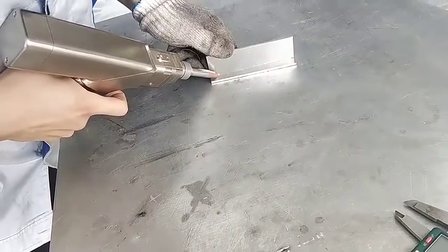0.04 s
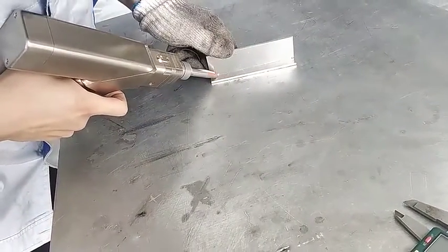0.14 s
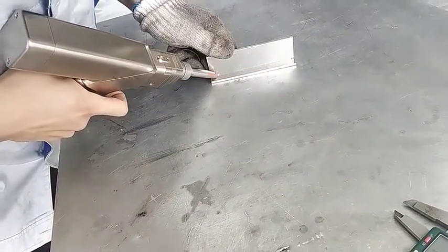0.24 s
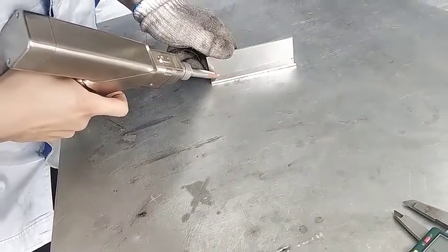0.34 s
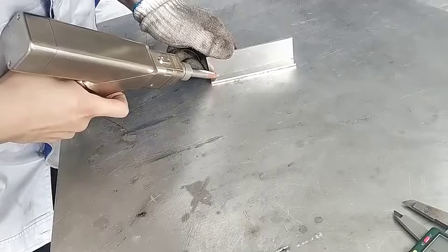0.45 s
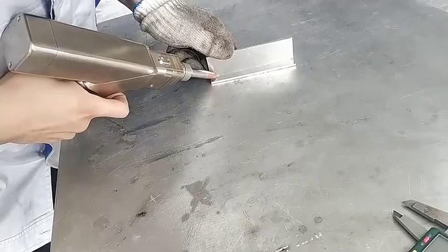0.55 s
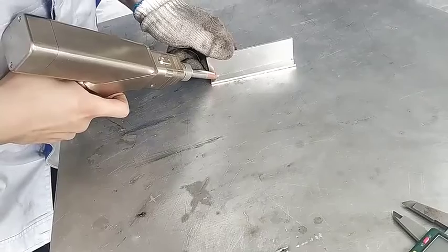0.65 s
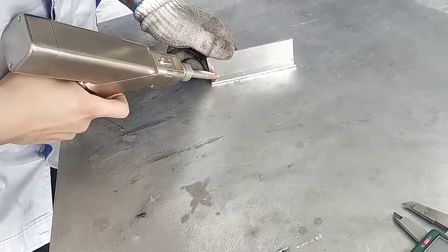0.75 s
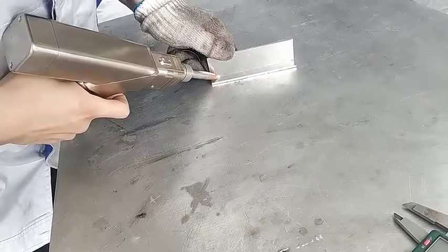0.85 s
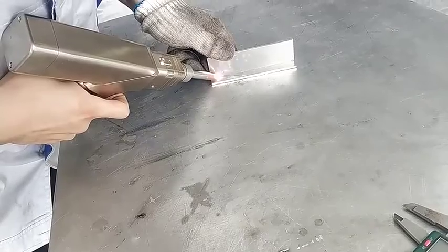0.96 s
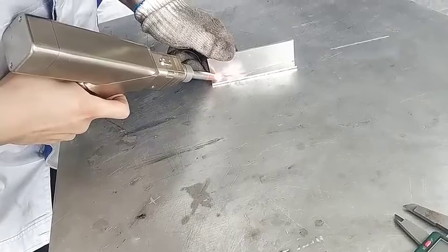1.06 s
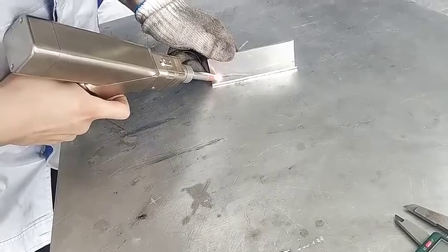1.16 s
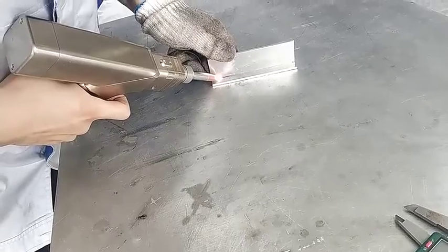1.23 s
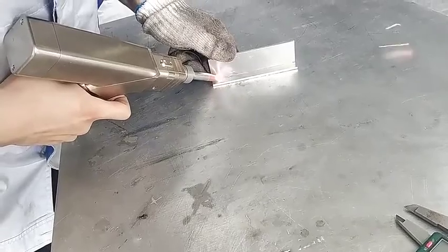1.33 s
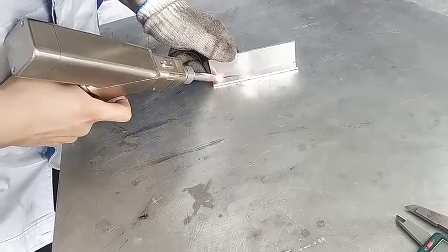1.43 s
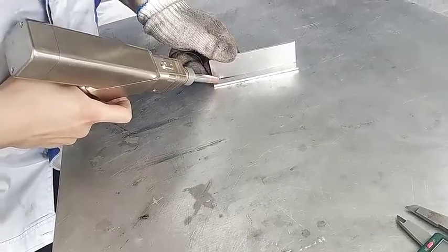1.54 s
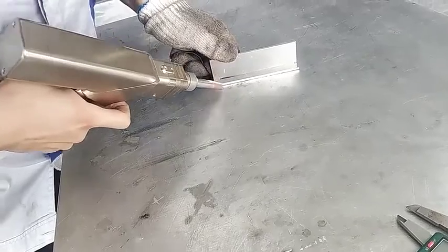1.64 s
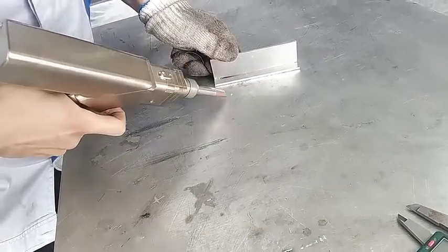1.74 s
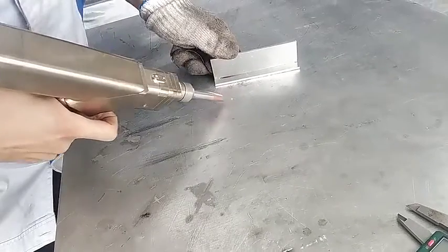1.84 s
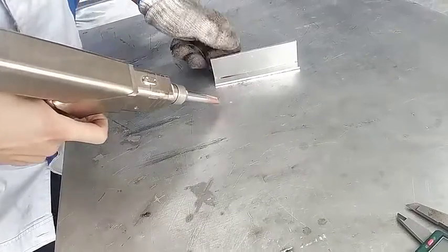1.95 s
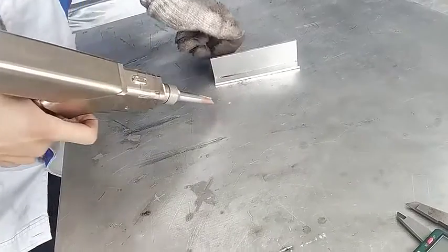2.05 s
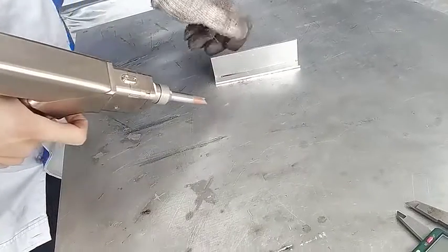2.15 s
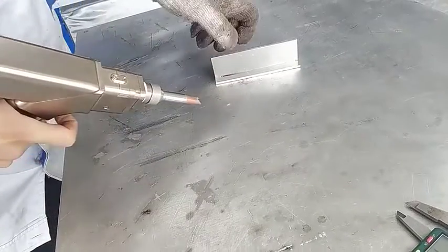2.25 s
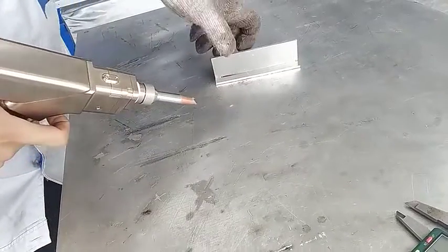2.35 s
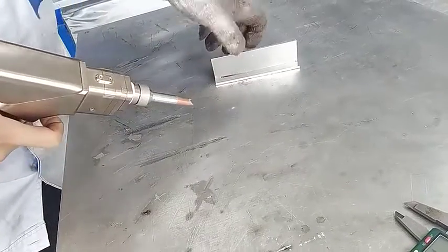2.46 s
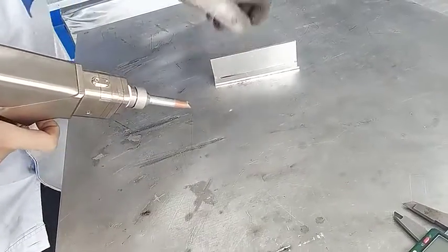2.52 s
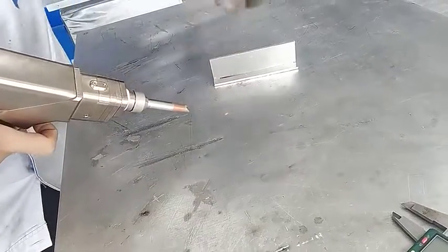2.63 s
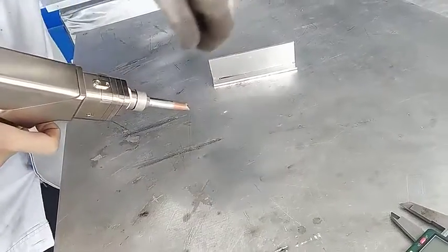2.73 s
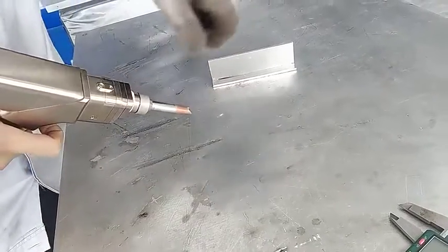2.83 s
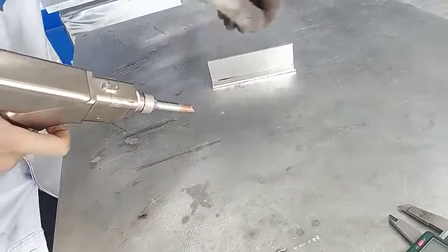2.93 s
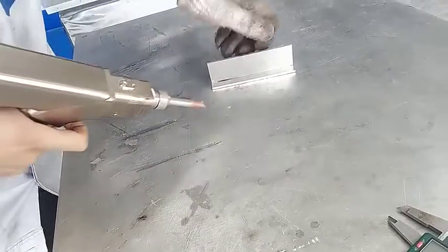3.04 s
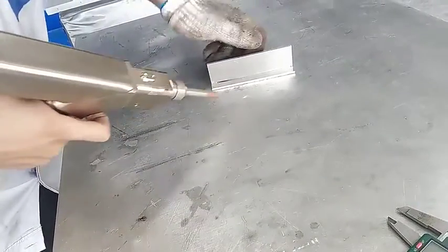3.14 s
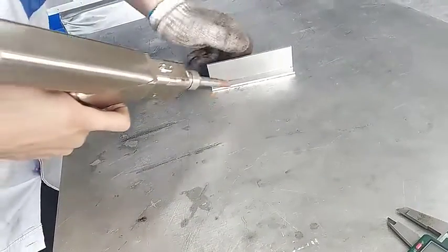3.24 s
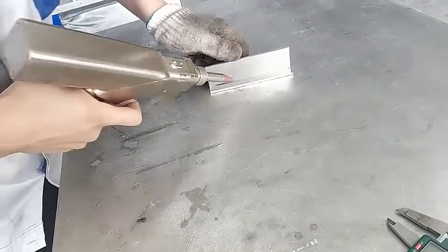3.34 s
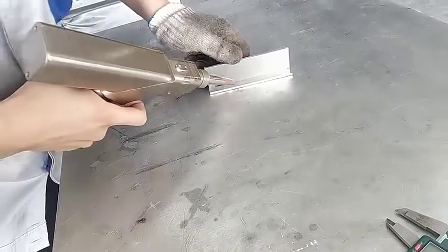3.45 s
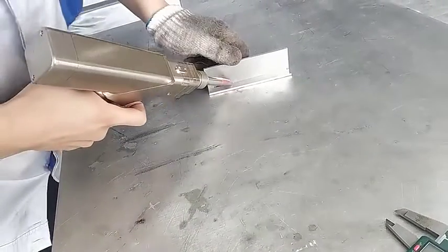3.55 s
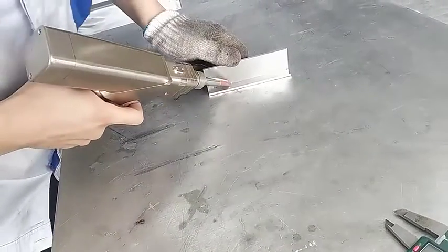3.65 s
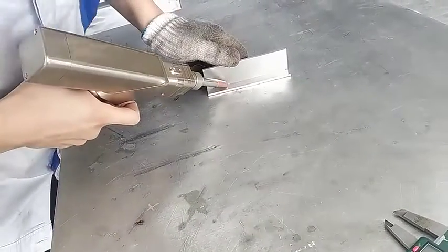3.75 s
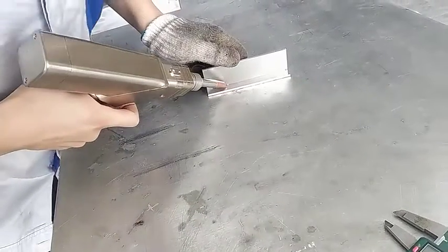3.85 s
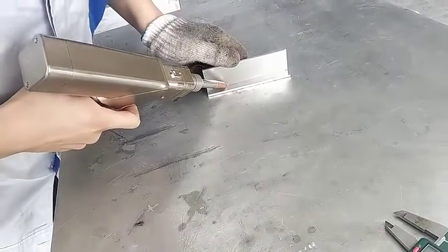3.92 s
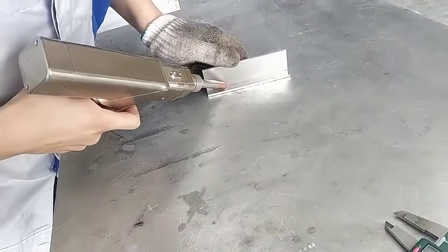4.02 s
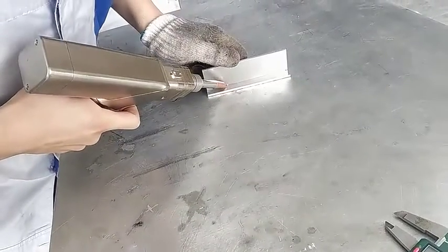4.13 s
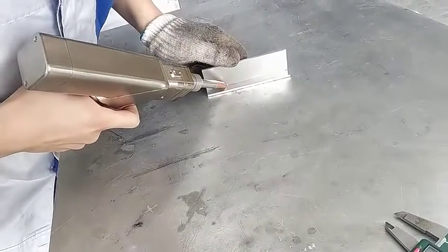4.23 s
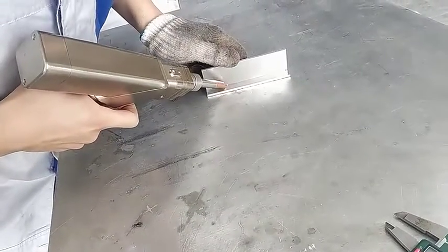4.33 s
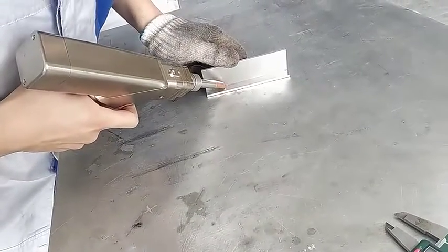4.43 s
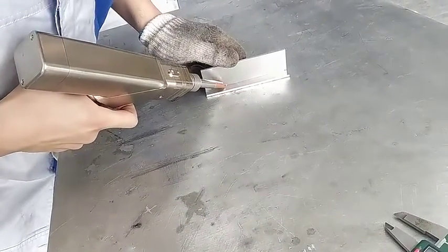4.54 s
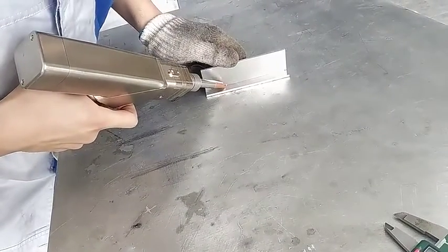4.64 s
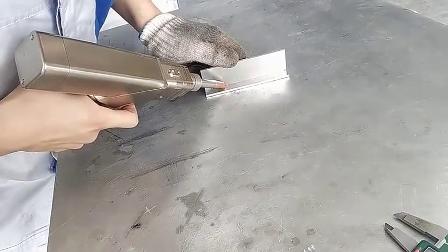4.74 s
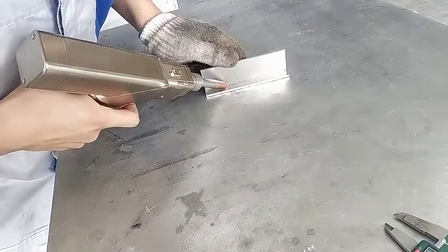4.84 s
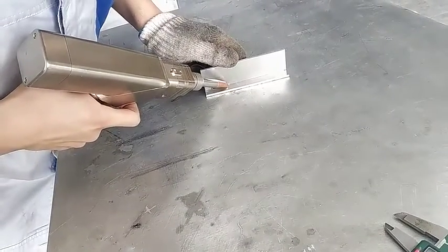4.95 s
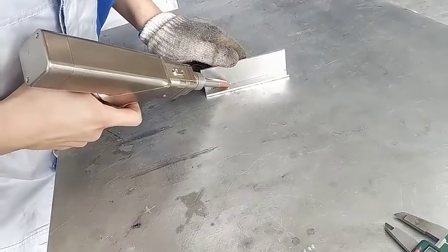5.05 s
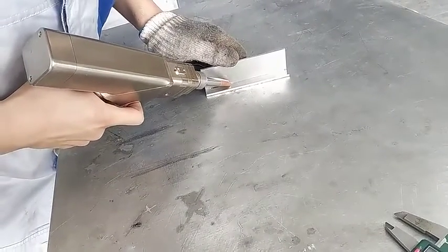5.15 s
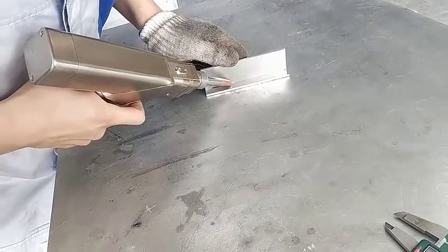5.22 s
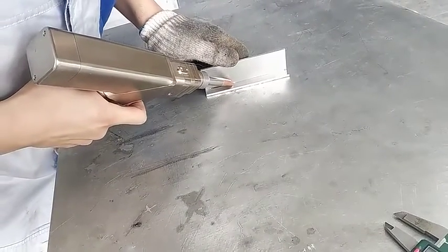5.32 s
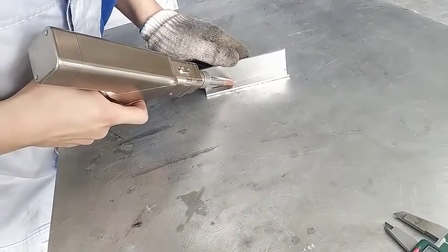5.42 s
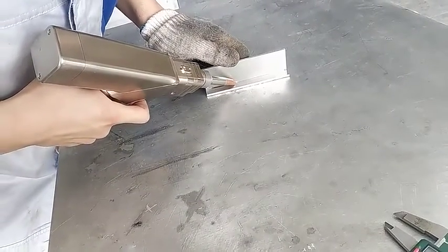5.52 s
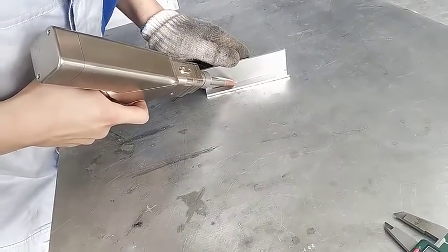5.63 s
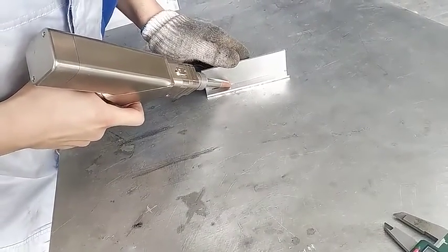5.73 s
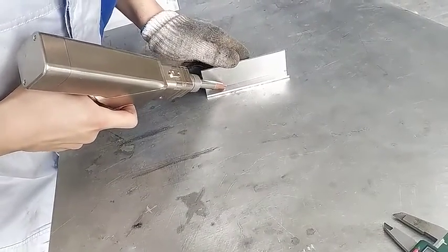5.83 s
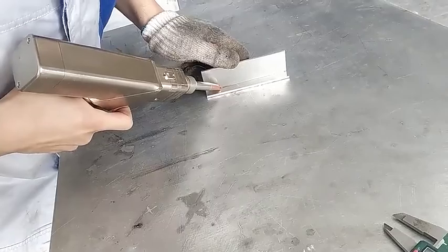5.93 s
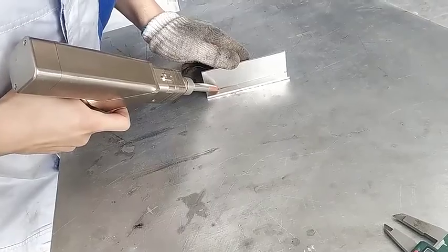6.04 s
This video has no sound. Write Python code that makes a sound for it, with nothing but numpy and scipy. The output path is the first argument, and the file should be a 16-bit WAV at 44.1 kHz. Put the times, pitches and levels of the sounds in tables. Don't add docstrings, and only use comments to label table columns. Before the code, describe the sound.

Steady fan drone and gritty scraping on steel, then a hard relay snap and a short gas hiss, followed by busy, bursting scrapes.

```python
import sys
import numpy as np
from scipy import signal
from scipy.fft import rfft, irfft, next_fast_len
from scipy.io import wavfile
from scipy.ndimage import uniform_filter1d, map_coordinates

SR = 44100
rng = np.random.default_rng(int(sys.argv[2]) if len(sys.argv) > 2 else 0)


def attenuation_scalar(level_db):
    decades = np.asarray(level_db, float) / 20
    return 10 ** decades


def pcm_store(signal):
    levels = np.round(np.clip(np.atleast_2d(signal), -1, 1) * 32767)
    wavfile.write(sys.argv[1], SR, levels.astype(np.int16).T)


N = 268128


def unit(x):
    return x / np.sqrt(np.mean(x ** 2) + 1e-20)


def along(points, hz):
    f, v = np.transpose(points)
    return np.interp(np.log(hz + 1), np.log(f + 1), v)


def curves(rows):
    s, *cols = np.transpose(rows)
    return [np.interp(np.arange(N) / SR, s, c) for c in cols]


def wobble(rate):
    knots = rng.standard_normal(int(N * rate / SR) + 4)
    return map_coordinates(knots, [np.arange(N) * rate / SR])


def held(start, end, rise_db, fall_db):
    t = np.arange(N) / SR
    return -rise_db * np.maximum(start - t, 0) - fall_db * np.maximum(t - end, 0)


def filtered(x, response):
    m = next_fast_len(N + SR // 2)
    return irfft(rfft(x, m) * response(np.fft.rfftfreq(m, 1 / SR)), m)[..., :N]


def peaks(modes, hz):
    return sum(attenuation_scalar(2 * db) / (1 + (2 * (hz - c) / w) ** 2) for c, w, db in modes)


def rush(response, patchy_db, gritty_db):
    grains = rng.standard_normal(N) * attenuation_scalar(gritty_db * wobble(500))
    z = signal.stft(grains, nperseg=512)[2]
    field = uniform_filter1d(uniform_filter1d(rng.standard_normal(z.shape), 5, 0), 8, 1)
    patchy = signal.istft(z * attenuation_scalar(patchy_db * unit(field)), nperseg=512)[1][:N]
    return unit(filtered(patchy, response))


def favour(x, s, centre_hz, width_hz, db):
    hz, t, z = signal.stft(x, SR, nperseg=512)
    offset = hz[:, None] - np.interp(t, s, centre_hz)
    rise = attenuation_scalar(2 * np.interp(t, s, db)) / (1 + (2 * offset / width_hz) ** 2)
    gain = np.sqrt(1 + rise)
    gain = gain * np.linalg.norm(z, axis=0) / (np.linalg.norm(z * gain, axis=0) + 1e-12)
    return signal.istft(z * gain, nperseg=512)[1][:N]


# frequency in Hz, density in dB per Hz.
FAN_AIR = [(25, -16), (75, -15), (124, -11.5), (182, -3.5), (218, -3.5), (400, -5), (650, -10), (1230, -14),
           (2850, -11.5), (6430, -14), (8960, -21), (9900, -14.5), (10400, -29), (11090, -32),
           (11200, -120)]
# frequency in Hz, width in Hz, rise over the air in dB.
FAN_TONES = [(200, 5, 9.5), (231, 14, 4), (286, 14, 5), (330, 30, 0), (600, 10, 3), (2655, 40, 3),
             (2960, 30, 4), (5000, 16, 5)]


def fans():
    colour = lambda hz: attenuation_scalar(along(FAN_AIR, hz)) * np.sqrt(1 + peaks(FAN_TONES, hz))
    air = rush(colour, patchy_db=1.27, gritty_db=0.24)
    rumble = filtered(air, lambda hz: 1 / (1 + (hz / 330) ** 4))
    lumps = attenuation_scalar(1.6 * wobble(16) - .3)
    return attenuation_scalar(-29.5) * attenuation_scalar(0.44 * wobble(9.8)) * (air + (lumps - 1) * rumble)


# frequency in Hz, density in dB per Hz.
HISS_COLOUR = [(2650, -17.5), (4500, -8.5), (6110, -3.5), (7360, -2.5), (9280, 0.5), (10300, -10),
               (11080, -30), (11180, -68), (22000, -120)]
# frequency in Hz, density in dB per Hz.
RASP_COLOUR = [(250, -14), (600, -17.5), (1200, -11.5), (1900, -5), (2700, -1), (3500, -3), (5500, -4),
               (7000, -33)]
# time in seconds, pressure in dB, coarseness in dB.
LIGHT_CONTACT = [(0, -34, -9), (.3, -33.5, -4.5), (.47, -28.5, -1.5), (.64, -32.5, 1), (.72, -32.5, -4),
                 (.89, -34.5, -23), (1.3, -42, 5), (1.5, -31, -2), (1.9, -31, -5), (2.1, -32.5, -2),
                 (2.92, -31.5, -5), (3.1, -31.5, 2), (3.5, -30, -1), (4.0, -41, 5.5), (4.9, -37.5, 0.5),
                 (5.5, -31, 0.5), (5.7, -36, -7.5), (5.95, -31.5, -2.5), (6.08, -31.5, -3)]
# start in seconds, hold in seconds, pressure in dB, coarseness in dB,
# easing off in dB per second.
HAND_PUSHES = [(1.425, 0.091, -34.5, -2.5, 80), (2.324, 0.046, -30.5, -2, 80),
               (2.415, 0.16, -28.5, -1.5, 80), (2.783, 0.025, -31, 0, 84), (3.147, 0.055, -27, -3.5, 63),
               (3.358, 0.051, -23.5, -6, 76), (3.6, 0.086, -23.5, -5, 90), (3.802, 0.14, -27.5, -5.5, 300),
               (4.02, .02, -30.5, -7, 80), (4.093, 0.1, -22.5, -8, 220), (4.325, 0.13, -24.5, -5.5, 76),
               (4.606, 0.19, -27.5, -3, 200), (4.948, 0.13, -31.5, -4, 83), (5.293, 0.061, -27.5, -2.5, 76)]
# time in seconds, high ring in Hz, low ring in Hz,
# low ring in dB.
TOOL_ANGLE = [(0, 9000, 3100, -13), (.8, 9200, 2800, -3), (1.9, 8800, 2900, -10), (2.6, 8700, 3370, 1),
              (3.14, 8830, 2840, -9), (3.4, 8600, 3660, 10), (3.68, 8100, 2920, -13), (3.8, 9400, 2990, -3),
              (3.87, 8100, 3000, 20), (3.96, 7960, 2570, -4), (4.15, 8250, 2820, -16),
              (4.38, 9200, 3600, 5), (4.7, 8500, 2900, 0), (5.2, 9000, 2850, -15), (5.32, 9250, 3700, 11),
              (5.6, 8600, 3000, 1), (6.08, 9300, 2900, -16)]
PRESS_DB_PER_S = 244


def abrasive():
    rest_db, coarse_db = curves(LIGHT_CONTACT)
    hiss_power, rasp_power = attenuation_scalar(2 * rest_db), attenuation_scalar(2 * (rest_db + coarse_db))
    for s, hold, db, coarse, lift in HAND_PUSHES:
        push = attenuation_scalar(2 * (db + held(s, s + hold, PRESS_DB_PER_S, lift)))
        hiss_power = hiss_power + push
        rasp_power = rasp_power + push * attenuation_scalar(2 * coarse)
    chatter_db = .5 * wobble(22.25)
    high = rush(lambda hz: attenuation_scalar(along(HISS_COLOUR, hz)), patchy_db=2.0, gritty_db=1.5)
    low = rush(lambda hz: attenuation_scalar(along(RASP_COLOUR, hz)), patchy_db=1.7, gritty_db=1.3)
    s, high_hz, low_hz, ring_db = np.transpose(TOOL_ANGLE)
    high = favour(high, s, high_hz, width_hz=1900, db=5.5 + 0 * s)
    low = favour(low, s, low_hz, width_hz=550, db=ring_db)
    hiss = attenuation_scalar(1.5) * np.sqrt(hiss_power) * high
    rasp = attenuation_scalar(1.0) * np.sqrt(rasp_power) * low
    return attenuation_scalar(chatter_db) * (hiss + rasp)


# time in seconds, length in ms, level in dB, high ring in Hz, low ring in Hz.
GRIT_DIGS = [(0.486, 22, -25, 7950, 3600), (1.747, 14, -21, 7100, 2750), (1.757, 41, -21, 7550, 3100),
             (1.853, 48, -24.5, 9400, 2500), (1.906, 16.5, -19, 7200, 2700), (1.926, 42, -26.5, 8500, 2620),
             (2.509, 26, -22, 7460, 3300), (2.578, 31, -21, 9100, 3370), (2.868, 30, -23.5, 9100, 3000),
             (3.005, 22, -29, 9400, 2790), (3.134, 12, -22, 8800, 2720), (3.202, 14, -20, 8300, 2620),
             (3.249, 19, -22.5, 7840, 3430), (3.382, 74, -31, 8400, 3300), (3.581, 15, -20, 7440, 3480),
             (3.868, 16, -20, 9100, 2900), (3.929, 8, -22, 7900, 2700), (4.124, 77, -28, 7900, 3260),
             (4.336, 8.9, -23, 9350, 3230), (4.655, 18, -20.5, 9050, 4100), (4.73, 10, -18.5, 8200, 2760),
             (4.779, 20, -21.5, 7300, 2750), (4.969, 11, -20, 9100, 3100)]
# time in seconds, length in ms, level in dB,
# high ring in Hz.
EDGE_SKIMS = [(2.256, 10, -25, 8850), (2.406, 28, -21, 7350), (2.745, 29, -22, 10000),
              (2.779, 16, -18.5, 9000), (2.815, 19, -17, 7700), (2.43, 20, -24, 8800),
              (3.492, 15, -20, 9400), (3.681, 33, -26, 7850), (3.615, 13, -28, 9400),
              (3.703, 14, -23, 7400), (3.735, 14, -26, 9400), (3.81, 18, -23, 8200), (3.842, 13, -20, 9400),
              (3.898, 12, -20.5, 7340), (4.023, 18, -26, 9200), (4.088, 14, -23, 8300),
              (4.177, 18, -22, 9100), (4.37, 18, -18.5, 9200), (4.29, 28, -24, 8850),
              (4.396, 21, -20, 9100), (4.428, 16, -18.5, 9000), (4.49, 25, -30, 8500),
              (4.531, 54, -36, 8500), (4.35, 23, -27, 9200), (2.235, 20, -30, 8800), (4.567, 12, -22, 9380),
              (4.614, 11, -18, 7750), (4.685, 21, -20, 7600), (4.93, 40, -28.5, 8800),
              (5.005, 12, -19.5, 7960), (5.037, 18, -20, 9300), (5.074, 23, -19.5, 7400),
              (5.123, 25, -24, 7620), (5.297, 15, -22, 9700), (5.354, 14, -23, 9400),
              (5.39, 18, -23.5, 8900)]
# time in seconds, length in ms,
# level in dB, ring in Hz.
PLATE_GROANS = [(0.42, 82, -32, 3100), (0.55, 50, -35, 2850), (3.63, 58, -26, 3700), (3.831, 40, -26, 2900),
                (3.86, 65, -26.5, 2800), (2.575, 49, -29, 3100), (2.42, 40, -29, 3000),
                (4.13, 97, -27.5, 2680), (3.661, 90, -32, 5540), (4.39, 70, -33, 4200),
                (4.529, 110, -29.5, 3600), (5.33, 82, -31.5, 3600), (5.42, 81, -31, 3700),
                (5.52, 70, -37, 4000)]
DIG_RASP_DB, SKIM_RASP_DB, SKIM_LOW_HZ = -3, -24, 3100
GROAN_OVER_DB = 20


def catches():
    out, size = np.zeros(N + SR), 8192
    t, hz = (np.arange(size) - size // 2) / SR, np.fft.rfftfreq(size, 1 / SR)
    bites = [(*dig, DIG_RASP_DB) for dig in GRIT_DIGS]
    bites += [(*skim, SKIM_LOW_HZ, SKIM_RASP_DB) for skim in EDGE_SKIMS]
    bites += [(s, ms, db - GROAN_OVER_DB, 8000, ring_hz, GROAN_OVER_DB) for s, ms, db, ring_hz in PLATE_GROANS]
    for s, ms, hiss_db, hiss_hz, rasp_hz, under_db in bites:
        swell = np.exp(np.where(t < 0, 1, .4) * -(t / (ms * 0.00043)) ** 2)
        rings = [(hiss_db, hiss_hz, HISS_COLOUR, 350, 9),
                 (hiss_db + under_db, rasp_hz, RASP_COLOUR, 450, 6)]
        for db, ring_hz, colour, width_hz, rise_db in rings:
            gain = attenuation_scalar(along(colour, hz)) * np.sqrt(1 + peaks([(ring_hz, width_hz, rise_db)], hz))
            flutter_db = 0.42 * np.repeat(rng.standard_normal(size // 64), 64)
            grit = rng.standard_normal(size) * attenuation_scalar(flutter_db)
            burst = swell * unit(irfft(rfft(grit) * gain))
            out[round(s * SR) - size // 2:][:size] += attenuation_scalar(db - 2.0) * burst
    return out[:N]


# frequency in Hz, width in Hz, level in dB.
NOZZLE_MODES = [(7440, 190, -7), (7650, 150, -5.5), (8200, 300, -10), (8650, 200, -8), (8900, 200, -8),
                (9550, 260, 2), (10150, 380, -4), (10980, 400, -11)]
# frequency in Hz, width in Hz, level in dB.
HOSE_MODES = [(2680, 140, -4), (3350, 130, -4), (4220, 220, -2), (5030, 150, 1), (5660, 150, 3),
              (7550, 300, 3)]
HOSE_FILL_S, VALVE_OPEN_S, SNAP_S, VALVE_SHUT_S, HOSE_EMPTY_S = .914, .92, .9301, 1.455, 1.58
OPEN_DB_PER_S, SHUT_DB_PER_S, EMPTY_DB_PER_S = 550, 330, 150
WHISTLE_DB, PIPE_DB = -27.5, -34.5
SURGE_DB, SURGE_S = 2.5, 0.08
DUCK_DB, DUCK_S = -3, .01
THROAT_HZ, THROAT_WIDTH_HZ, THROAT_DB, THROAT_FADE_DB_PER_S = 2190, 360, -34, 13


def gas():
    t = np.arange(N) / SR
    since = t - SNAP_S
    duck_db = DUCK_DB * (since > 0) * np.exp(-np.abs(since) / DUCK_S)
    whistle_db = WHISTLE_DB + duck_db + held(VALVE_OPEN_S, VALVE_SHUT_S, OPEN_DB_PER_S, SHUT_DB_PER_S)
    surge_db = SURGE_DB * np.exp(-np.abs(t - VALVE_OPEN_S) / SURGE_S)
    flow_db = held(HOSE_FILL_S, HOSE_EMPTY_S, 2 * OPEN_DB_PER_S, EMPTY_DB_PER_S)

    def nozzle_colour(hz):
        return np.sqrt(peaks(NOZZLE_MODES, hz)) * (.08 + 1 / (1 + (hz / 10480) ** 80))

    def hose_colour(hz):
        return np.sqrt(.35 * (hz < 7000) + peaks(HOSE_MODES, hz)) / (1 + (2000 / (hz + 1)) ** 16)

    nozzle = rush(nozzle_colour, patchy_db=1.5, gritty_db=1.3)
    hose = rush(hose_colour, patchy_db=1.6, gritty_db=1)
    throat_mode = [(THROAT_HZ, THROAT_WIDTH_HZ, 0)]
    throat = unit(filtered(rng.standard_normal(N), lambda hz: peaks(throat_mode, hz)))
    throat_db = THROAT_DB + flow_db - THROAT_FADE_DB_PER_S * np.abs(since) - 9 * (since < 0) + .5 * wobble(25)
    nozzle = attenuation_scalar(5.0 + 0.3 * wobble(30.1)) * attenuation_scalar(whistle_db) * nozzle
    hose = attenuation_scalar(5.0 + PIPE_DB + duck_db + surge_db + flow_db) * hose
    return nozzle + hose + attenuation_scalar(throat_db) * throat


# frequency in Hz, level in dB, 60 dB decay time in seconds.
RELAY_MODES = [(300, -19, .009), (700, -18, .007), (1000, -16, .006), (1450, -16, .005), (2250, -6.5, .011),
               (3100, -16, .004), (4100, -11, .005), (5600, -10, .005)]
SNAP_DB = -1.5


def relay():
    t = np.maximum(np.arange(N) / SR - SNAP_S, 0)
    ring = -sum(attenuation_scalar(SNAP_DB + db - 60 * t / t60) * np.sin(2 * np.pi * hz * t) for hz, db, t60 in RELAY_MODES)
    return filtered(ring, lambda hz: (1j * hz / (160 + 1j * hz)) ** 2)


def scene():
    return np.tile(fans() + abrasive() + catches() + gas() + relay(), (2, 1))


def denoiser(x, depth):
    z = signal.stft(x, nperseg=2048, noverlap=1536)[2]
    power = np.abs(z) ** 2 + 1e-16
    cell = uniform_filter1d(uniform_filter1d(power, 2, 0), 4, 1)
    around = uniform_filter1d(uniform_filter1d(power, 25, 0), 6, 1)
    y = signal.istft(z * np.abs(cell / around) ** depth, nperseg=2048, noverlap=1536)[1][:N]
    return unit(y) * np.std(x)


# time in seconds, length in ms, centre in Hz, width in Hz,
# depth in dB.
SUPPRESSED = [
    (.885, 30, 4000, 500, -10),
    (1.29, 90, 1800, 200, -10),
    (3.525, 40, 2150, 800, -18),
    (3.845, 20, 3600, 300, -12),
    (3.88, 130, 1600, 1100, -6),
    (4.47, 100, 1150, 500, -5),
    (4.87, 110, 5000, 5000, -2),
    (5.2, 70, 7000, 1800, -4),
    (5.385, 30, 6500, 1400, -7),
    (5.78, 120, 6400, 1400, -4),
]


def hollows(x):
    hz, t, z = signal.stft(x, SR, nperseg=1024, noverlap=768)
    db = 0
    for s, ms, centre_hz, width_hz, depth_db in SUPPRESSED:
        in_pitch = ((hz[:, None] - centre_hz) / (.6 * width_hz)) ** 4
        in_time = ((t - s) / (ms * .0006)) ** 2
        db = db + depth_db * np.exp(-in_pitch - in_time)
    return signal.istft(z * attenuation_scalar(db), nperseg=1024, noverlap=768)[1][:N]


def top_gate(x, from_hz, floor_db):
    hz, t, z = signal.stft(x, SR, nperseg=2048)
    level = np.abs(uniform_filter1d(uniform_filter1d(np.abs(z) ** 2, 12, 0), 2, 1))
    faint = (level < attenuation_scalar(2 * floor_db)) & (hz[:, None] > from_hz)
    shut = np.maximum.accumulate(faint, axis=0)
    return signal.istft(z * ~shut, nperseg=2048)[1][:N]


# frequency in Hz, share of time unlike (0 to 1).
UNLIKE_SHARE = [(4000, 0), (4700, .06), (5700, .18), (7000, .28), (8600, .38), (9500, .3), (10000, .05),
                (10400, 0)]
FRAME_LEAD = 114


def widening(x):
    hz, t, z = signal.stft(np.pad(x, (FRAME_LEAD, 0)), SR, nperseg=2048)
    band = (np.log(hz + 1) * 9).astype(int)
    luck = rng.standard_normal((band[-1] + 1, len(t)))
    luck = luck + np.roll(luck, 1, 0) + uniform_filter1d(luck[0], 2)
    rank = 1 / (1 + np.exp(-1.07 * luck[band]))
    wide = rank < along(UNLIKE_SHARE, hz)[:, None]
    level = np.sqrt(np.abs(uniform_filter1d(np.abs(z) ** 2, 25, 0)))
    phase = np.exp(2j * np.pi * rng.random(z.shape))
    return signal.istft(attenuation_scalar(-1.5) * wide * level * phase, SR, nperseg=2048)[1][FRAME_LEAD:][:N]


def band_limit(x):
    return signal.sosfilt(signal.butter(12, 11260, fs=SR, output="sos"), x)


def record(dry):
    mid = filtered(dry[0], lambda hz: (1j * hz / (90 + 1j * hz)) ** 2)
    mid = mid / (1 + np.abs(mid / .53) ** 6) ** (1 / 6)
    mid = hollows(denoiser(mid, depth=0.26))
    mid = top_gate(mid, from_hz=10400, floor_db=-74.5)
    side = widening(mid)
    return band_limit(np.stack([mid + side, mid - side]))


dry = scene()
out = record(dry)
pcm_store(out)
```